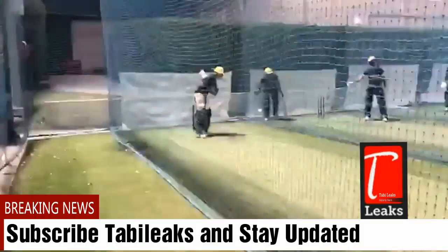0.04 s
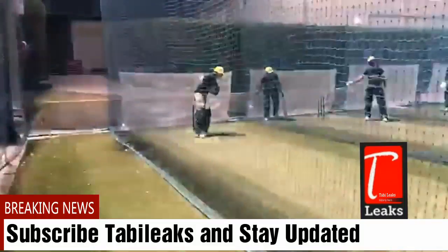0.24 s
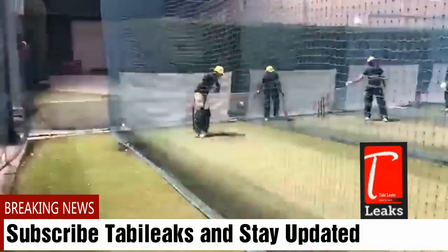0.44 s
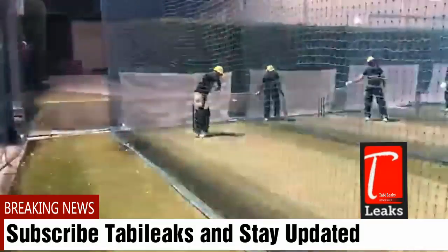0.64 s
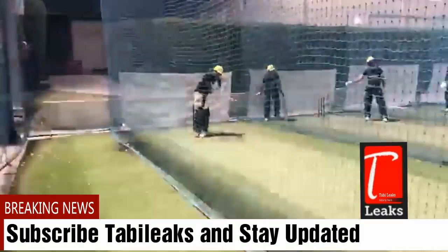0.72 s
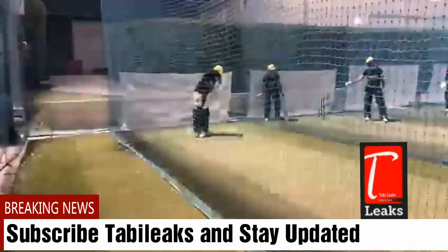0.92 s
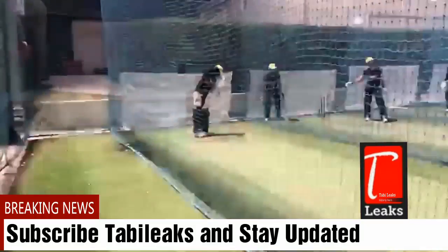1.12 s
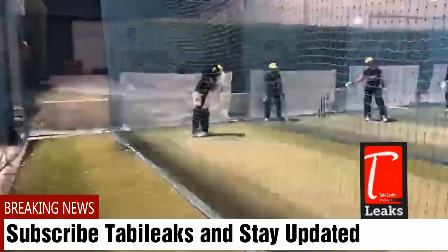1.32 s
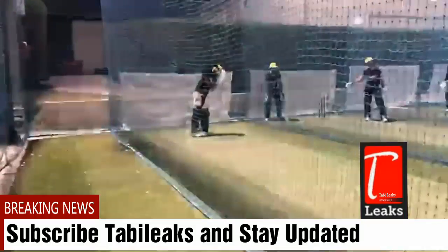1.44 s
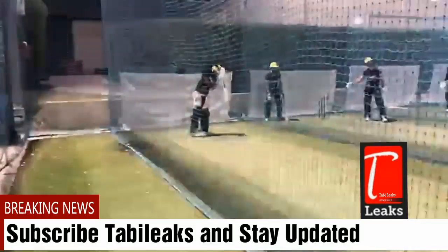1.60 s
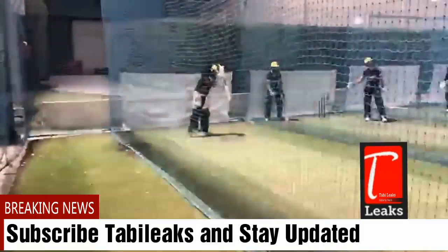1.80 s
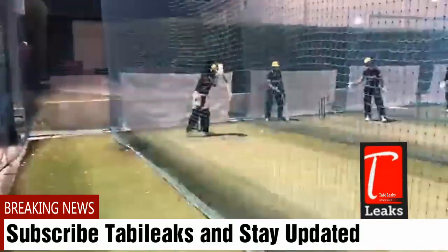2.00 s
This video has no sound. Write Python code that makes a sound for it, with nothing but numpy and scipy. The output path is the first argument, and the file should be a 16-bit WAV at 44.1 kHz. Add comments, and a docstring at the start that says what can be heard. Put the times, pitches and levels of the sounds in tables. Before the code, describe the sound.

A cricket bat hits a ball once with a sharp hollow tock, quick echoes and a low thump, then soft thuds in the net; faint scuffs and ticks come before, over deep hum, through a narrow, muffled microphone.

```python
"""A cricket bat cracks against a ball in outdoor practice nets: a sharp impulse, three quick echoes and scattered reflections.
Short decaying tones give the crack a hollow pitch; low sines that sag make the thump and softer thuds as the ball runs into the net.
Shaped noise makes scuffs and rustle and impulses make faint ticks, before and after the hit, over a low hum and distant rumble.
The narrow-band microphone rings near 1.7 kHz and cuts the treble: a hollow 'tock' with only a thin sheen and hiss above."""
import sys
import numpy as np
from scipy.fft import rfft, irfft, next_fast_len
from scipy.io import wavfile
from scipy.ndimage import map_coordinates

SR = 44100
rng = np.random.default_rng(int(sys.argv[2]) if len(sys.argv) > 2 else 0)


def unload_audio(sound):
    """Save the sound as a 16-bit wav file, at the path given as the first command line argument."""
    columns = np.transpose(np.atleast_2d(sound))
    # keep every value between -1 and 1, then stretch to whole-number steps
    steps = np.round(np.clip(columns, -1, 1) * 32767)
    wavfile.write(sys.argv[1], SR, steps.astype(np.int16))


N = 90846

RING_HZ = 1714.5  # resonance of the microphone


def amp(db):
    """Decibels to gain."""
    return 10 ** (np.asarray(db) / 20)


def along(points, hz):
    """(Hz, value) points read on a log frequency axis."""
    f, v = np.transpose(points)
    return np.interp(np.log(hz + 1), np.log(f + 1), v)


def filtered(x, response):
    """x filtered by a response given as a function of frequency."""
    m = 2 * next_fast_len(N)
    return irfft(rfft(x, m) * response(np.fft.rfftfreq(m, 1 / SR)), m)[:N]


def causal(gain):
    """The minimum-phase response with this gain, made by folding the cepstrum."""
    cepstrum = irfft(np.log(gain))
    half = len(cepstrum) // 2
    cepstrum[1:half] *= 2
    cepstrum[half + 1:] = 0
    return np.exp(rfft(cepstrum))


def noise(colour):
    """White noise through a (Hz, dB) curve."""
    return filtered(rng.standard_normal(N), lambda hz: amp(along(colour, hz)))


def wobble(rate):
    """A smooth random curve, rate knots a second."""
    return map_coordinates(rng.standard_normal(2048), [np.arange(N) * rate / SR], mode='wrap')


def grainy(colour):
    """Coloured noise that comes in small clumps."""
    grain_rate, grain_db = 160, 3  # knots a second, spread of the knots in dB
    clumps = amp(grain_db * wobble(grain_rate))
    return noise(colour) * clumps / np.sqrt(np.mean(clumps ** 2))


def since(s):
    """Seconds after s, zero before."""
    return np.maximum(np.arange(N) / SR - s, 0)


def burst(s, db, attack, t60):
    """An envelope that rises with time constant attack and falls 60 dB in t60 seconds."""
    t = since(s)
    return amp(db) * (1 - np.exp(-t / attack)) * np.exp(-np.log(1000) * t / t60)


def clicks(rows):
    """One single-sample impulse for each hard contact."""
    out = np.zeros(N)
    for s, db in rows:
        out[int(s * SR)] += amp(db)
    return out


def bat():
    """The crack and its first echoes, short decaying tones, a bright snap, then dense near reflections."""
    blow_s, blow_db = 1.7416, 16
    # echoes from the nearest surfaces: (delay [s], level [dB], polarity against the crack)
    echo_rows = [(.0069, 7, -1), (.0156, 2.5, 1), (0.0225, 0, -1)]
    # short decaying tones that give the crack a hollow, pitched colour: (frequency [Hz], level [dB], t60 [s])
    tone_rows = [(349, -22, .12), (430, -33.5, 0.263), (588.7, -23.5, 0.115), (662, -19.5, 0.11),
                 (975, -35, 0.08), (1068, -27.5, 0.1), (1584, -25, 0.092), (1640, -39, 0.103)]
    tone_attack_s = 0.0059
    # dense near reflections and a weak long tail: (delay [s], level [dB], attack [s], t60 [s])
    scatter_rows = [(.007, -10, 0.0053, 0.095), (0.019, -33.5, 0.036, 1)]
    # colour of the reflections: (frequency [Hz], gain [dB])
    scatter_colour = [(40, -21), (150, 15.5), (300, 7), (600, 8.5), (900, -2), (1400, -1.5), (1750, -4.5),
                      (2500, -32)]
    # colour of the snap, most of which the microphone cuts away: (frequency [Hz], gain [dB])
    snap_colour = [(1900, -40), (2300, -3.5), (2800, 1), (6000, 2), (11000, 0), (15000, 1)]
    snap_db, snap_attack_s, snap_t60_s = 10, 0.0011, 0.015

    crack = clicks([(blow_s, blow_db)])
    for delay, db, sign in echo_rows:
        crack += np.sign(sign) * clicks([(blow_s + delay, db)])
    tones = np.zeros(N)
    for hz, db, t60 in tone_rows:
        tones += burst(blow_s, db, tone_attack_s, t60) * np.sin(2 * np.pi * hz * since(blow_s))
    spread = sum(burst(blow_s + delay, db, attack, t60) for delay, db, attack, t60 in scatter_rows)
    reflections = spread * grainy(scatter_colour)
    snap = burst(blow_s, snap_db, snap_attack_s, snap_t60_s) * noise(snap_colour)
    return tones - crack + snap + reflections  # the crack starts with a negative pulse


def thuds():
    """Each thud is a few low cycles that sag in pitch and stop quickly."""
    # thump of the hit and softer thuds: (time [s], level [dB], starting pitch [Hz], fall to 1/e [s])
    thud_rows = [(1.75, -4, 102.8, 0.015), (1.751, -17.5, 160.3, 0.025), (1.788, -13.5, 64, 0.0083),
                 (1.9128, -18, 195, 0.0039), (1.921, -14, 108, 0.0105), (1.929, -22.5, 35, 0.035),
                 (1.815, -23, 97, 0.016)]
    attack_s, sag = 0.00079, 6.6  # time constant in s, pitch fall rate per s
    out = np.zeros(N)
    for s, db, hz, life in thud_rows:
        t = since(s)
        phase = 2 * np.pi * hz * (1 - np.exp(-sag * t)) / sag
        envelope = amp(db) * (1 - np.exp(-t / attack_s)) * np.exp(-(t / life) ** 2)
        out += envelope * np.sin(phase)
    return out


def scuffs():
    """Short rubs of shoes on turf and of the ball in the net, over a faint gritty rustle of feet."""
    # rubs of shoes and netting: (time [s], level [dB], attack [s], t60 [s])
    scuff_rows = [(.265, -39.5, 0.021, 0.36), (0.449, -43, .001, 0.49), (0.622, -38, 0.12, 0.65),
                  (1.041, -44.5, 0.019, .5), (1.871, -30.5, 0.002, .24), (1.902, -25, 0.0079, 0.21),
                  (1.978, -39, 0.0019, 0.17)]
    # colour of the rubs: (frequency [Hz], gain [dB])
    scuff_colour = [(40, -15.5), (130, 24.5), (300, 12.5), (700, 0.5), (1200, -5), (1800, -14), (2500, -9)]
    # feet on the turf: (time [s], level [dB])
    rustle_levels = [(0, -73), (.24, -79), (.3, -65.5), (.4, -68), (.52, -52), (.58, -58.5), (.74, -54),
                     (.85, -57.5), (.94, -54), (1.02, -54), (1.3, -63), (1.7, -59.5)]
    # colour of the rustle: (frequency [Hz], gain [dB])
    rustle_colour = [(100, -14.5), (900, -4), (1300, -8), (2000, -4.5)]
    rubs = sum(burst(s, db, attack, t60) for s, db, attack, t60 in scuff_rows)
    rustle = amp(np.interp(np.arange(N) / SR, *np.transpose(rustle_levels)))
    return rubs * grainy(scuff_colour) + rustle * grainy(rustle_colour)


def ticks():
    """Small, thin contacts around the nets: impulses through a minimum-phase colour."""
    # faint ticks: (time [s], level [dB])
    tick_rows = [(.2964, -31.5), (.4495, -28), (.5328, -25.5), (.7723, -26), (.895, -33), (.914, -16),
                 (.9319, -24), (.9385, -23.5), (1.7928, -10.5), (1.8741, -15.5)]
    # colour of the ticks: (frequency [Hz], gain [dB])
    tick_colour = [(200, -15), (900, -4), (1500, -5), (2000, 2)]
    return filtered(clicks(tick_rows), lambda hz: causal(amp(along(tick_colour, hz))))


def background():
    """A deep hum with drifting phase inside a soft distant rumble whose level wavers slightly."""
    hum_hz, hum_db, hum_drift = 25.55, -38, 2.15  # drift: spread of the phase knots in radians
    # distant rumble: (frequency [Hz], level [dB per Hz])
    air_colour = [(8, -47.5), (17, -46), (27, -46), (40, -62.5), (58, -67), (115, -67), (250, -76.5),
                  (500, -87.5), (800, -98), (1300, -105), (1750, -110), (2500, -116)]
    air_waver_db = 0.39
    hum_phase = 2 * np.pi * hum_hz * since(0) + hum_drift * wobble(rate=7.08)
    hum = amp(hum_db) * np.sin(hum_phase)
    rumble = np.sqrt(SR / 2) * noise(air_colour)
    return hum + rumble * amp(air_waver_db * wobble(rate=8))


def port(hz):
    """Gain of the microphone: a resonance just under a steep treble cut."""
    # broad response of the microphone: (frequency [Hz], gain [dB])
    port_slope = [(100, -1), (1000, 1), (1400, -1.5), (1850, -3), (2000, -5.5), (2200, -18.5), (2500, -49),
                  (3300, -45.5), (15000, -43)]
    ring_width_hz, ring_db, steepness = 237, 17, 1.73  # steepness: exponent of the peak's skirts
    skirts = (1 + (2 * (hz - RING_HZ) / ring_width_hz) ** 2) ** steepness
    peak_power = amp(ring_db) ** 2 / skirts
    return amp(along(port_slope, hz)) * np.sqrt(1 + peak_power)


def mirrors(x):
    """Coarse sampling copies the narrow band up into the treble as a thin, gritty sheen."""
    mirror_hz = 3905  # images lie on both sides of its multiples
    # one image level for each multiple in turn: (level [dB])
    mirror_levels = [-28, -34, -38, -42]
    slope = np.gradient(x) * SR / (2 * np.pi * RING_HZ)  # about unity gain at the resonance
    phase = 2 * np.pi * mirror_hz * np.arange(N) / SR
    carriers = sum(2 * amp(db) * np.cos((k + 1) * phase) for k, db in enumerate(mirror_levels))
    return slope * carriers


def hiss():
    """Faint steady hiss with soft humps near 3.9 and 7.8 kHz, made of shaped noise."""
    # colour of the hiss: (frequency [Hz], level [dB per Hz])
    hiss_colour = [(2000, -134), (3000, -133), (3900, -126), (4700, -133), (7000, -135), (7800, -131),
                   (8600, -135), (15000, -135)]
    return np.sqrt(SR / 2) * noise(hiss_colour)


def band_limit(hz):
    """Gain of a very steep cut near the top of the band, with a small floor."""
    top_hz = 15900
    return 1e-5 + 1 / (1 + (hz / top_hz) ** 120)


def scene():
    """Everything that reaches the microphone."""
    return (bat() + thuds() + scuffs() + ticks() + background())[None]


def record(dry):
    """Microphone colour, mirror images, faint hiss and the band limit."""
    narrow = filtered(dry[0], lambda hz: causal(port(hz)))
    heard = narrow + mirrors(narrow) + hiss()
    return filtered(heard, lambda hz: causal(band_limit(hz)))[None]


dry = scene()
out = record(dry)
unload_audio(out)
```